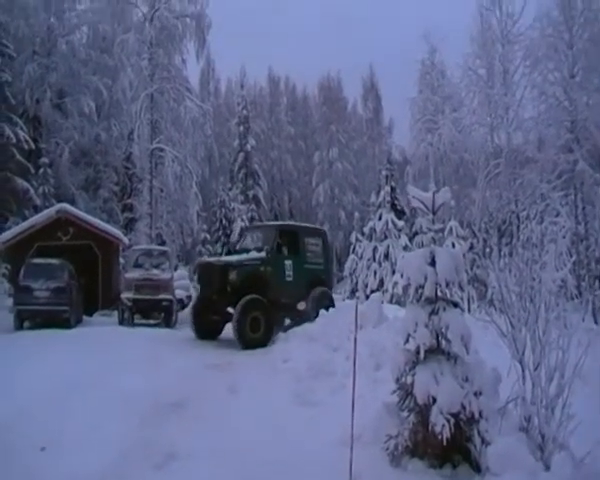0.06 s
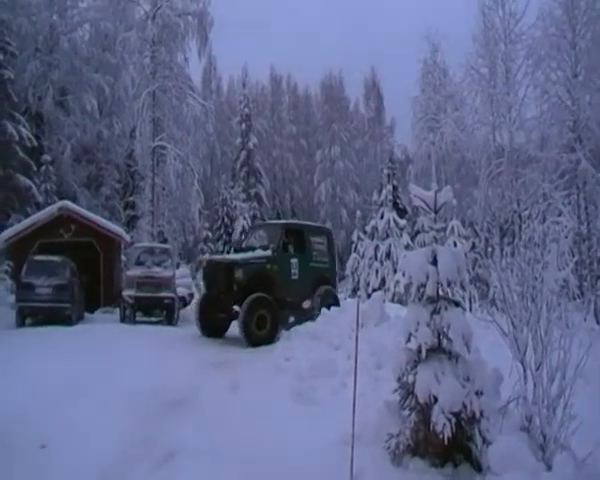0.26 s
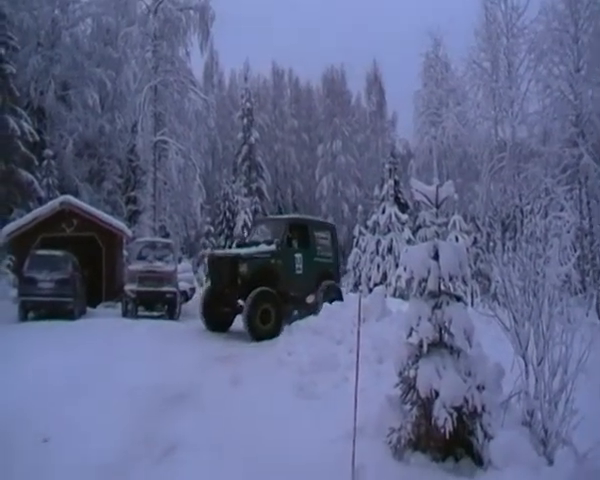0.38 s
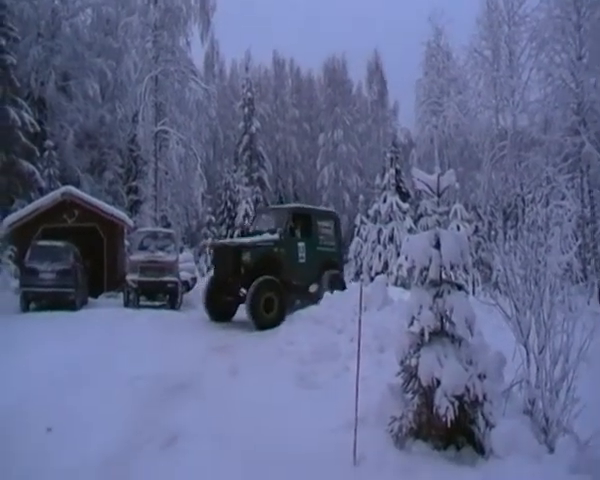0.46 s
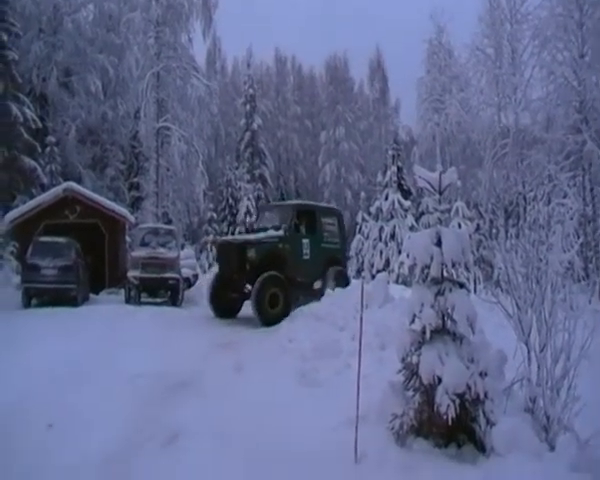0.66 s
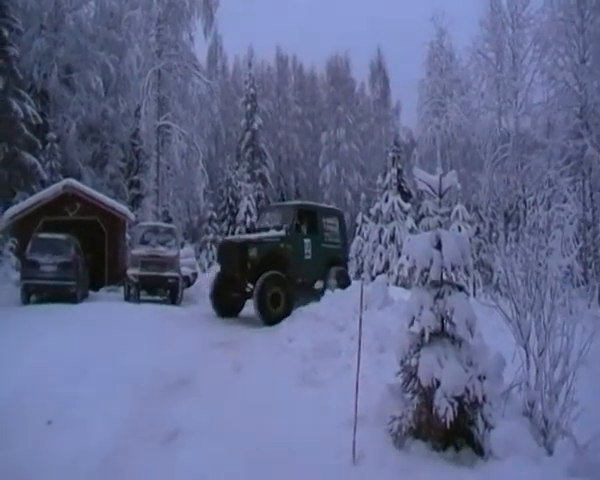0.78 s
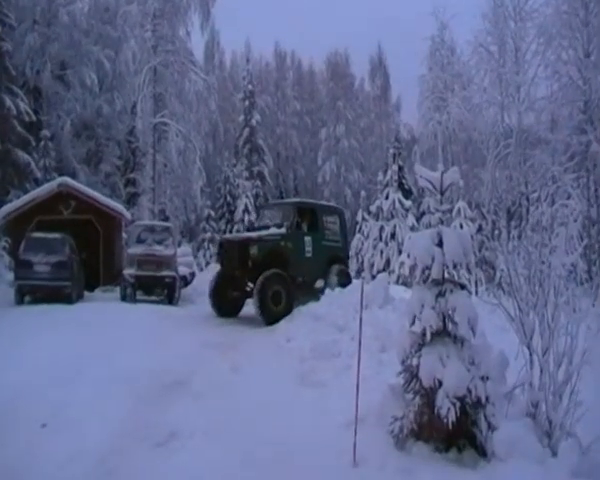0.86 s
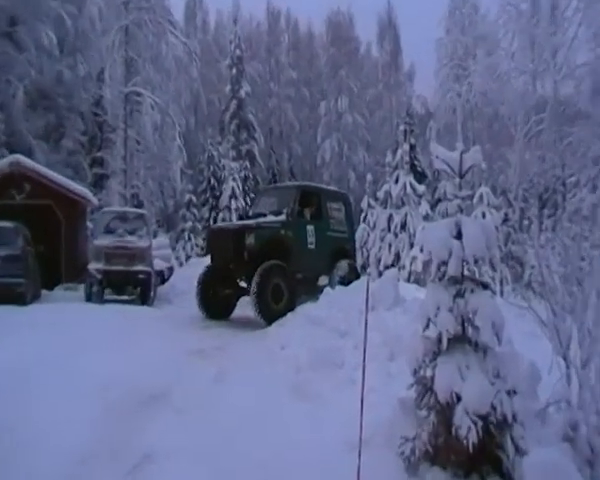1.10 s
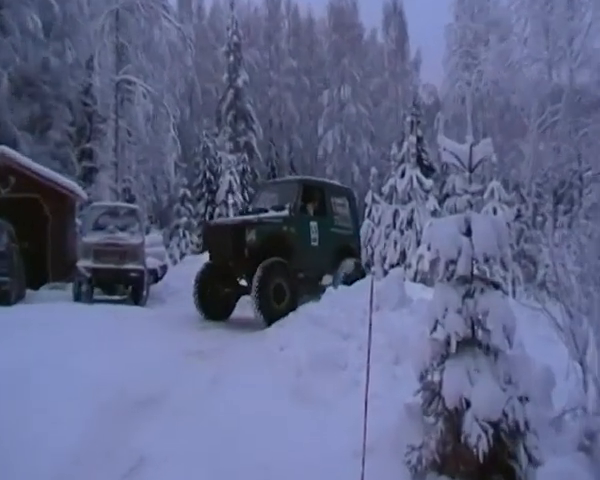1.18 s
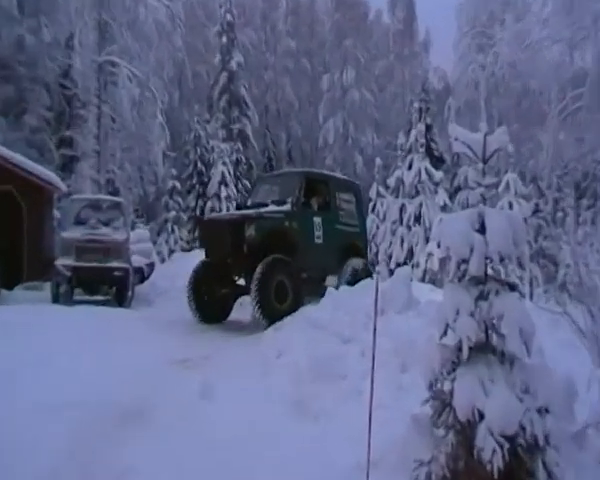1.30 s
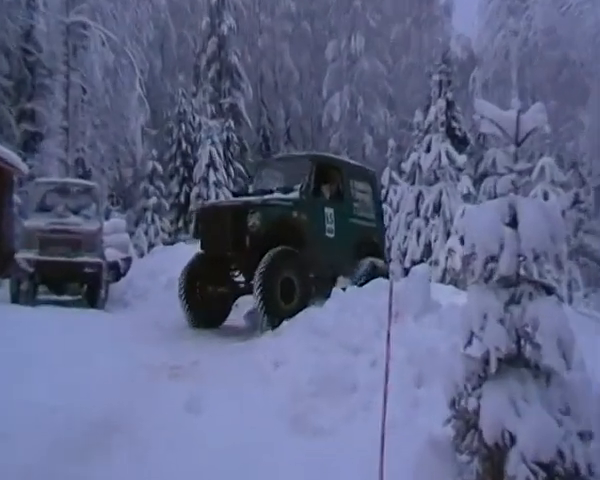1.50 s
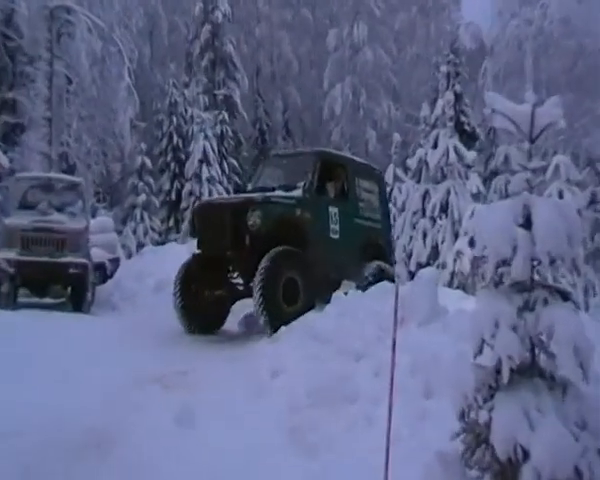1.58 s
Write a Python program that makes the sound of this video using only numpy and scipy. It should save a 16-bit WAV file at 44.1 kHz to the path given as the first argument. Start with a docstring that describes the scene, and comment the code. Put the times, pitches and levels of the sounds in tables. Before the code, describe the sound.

A small off-roader's drive belt squeaks over its low, pulsing engine in a snowy yard. The engine runs from the start with a soft fan rush. From about 0.2 seconds the much louder belt gives rapid, irregular high chirps and short squeals with a faint echo, rasping hardest around 1.2 seconds and stopping by 1.4. The engine gradually picks up speed from about 1 second to the end.

```python
"""A snowy yard, with a small off-roader labouring at one spot in front of a stereo microphone.
Its slipping drive belt is loudest: it chirps, bows the pulleys into squeals, and rasps when it grabs.
Underneath, the exhaust pulses, fan and valves rush and gears whine as the engine slowly picks up speed.
Trees and sheds return a faint echo of the belt."""
import sys
import numpy as np
from scipy import signal
from scipy.fft import rfft, irfft
from scipy.io import wavfile

SR = 44100
rng = np.random.default_rng(int(sys.argv[2]) if len(sys.argv) > 2 else 0)


def master_out(mix):
    """Clip the mix to full scale and print it as 16-bit PCM to the path in sys.argv[1]."""
    frames = np.transpose(np.atleast_2d(mix))
    ceiling = np.clip(frames, -1, 1)
    pcm = np.round(ceiling * 32767).astype(np.int16)
    wavfile.write(sys.argv[1], SR, pcm)


N = 72765

# Engine speed and exhaust harmonics: time_s, firing_hz, second_db, third_db, fourth_db
ENGINE_RUN = [(0, 30.96, -41.5, -51, -44.5), (.294, 28.59, -47, -41, -43.5), (.514, 29.09, -44, -45.5, -43),
              (1.0, 32.88, -40, -41, -50.5), (1.65, 41.97, -32, -39.5, -50)]


def belt_chirps():
    """Each slip swells the belt's whistle and drags it flat; a second rib sags less and beats with it."""
    # Slips of the belt: peak_s, rise_s, fall_s, lowest_hz, level_db, flutter_ratio
    slips = [(0.236, 0.0029, 0.0074, 4170, -22, 0.2), (.309, 0.0033, 0.0038, 4730, -14, 0.14),
             (0.32, 0.0023, 0.0039, 4630, -22, 0.14), (0.379, 0.0051, 0.0082, 4640, -14, 0.18),
             (.513, 0.0028, 0.0054, 4340, -16, 0.31), (.574, .005, .010, 3940, -19, 0.97),
             (.640, .004, 0.0082, 3880, -18.5, 1.11), (0.827, 0.0035, 0.0017, 4700, -28.5, 0.14),
             (0.838, 0.0031, 0.00714, 4620, -19.5, 0.14), (.902, .005, 0.01311, 4250, -20, 0.48),
             (.945, 0.0035, 0.0037, 4370, -36, 0.42), (0.963, .008, .010, 4130, -20.5, 0.43),
             (1.005, 0.00484, 0.01, 4130, -21.5, 0.48), (1.025, 0.0049, 0.0079, 4080, -17.5, .5),
             (1.067, 0.00388, 0.0071, 4153, -21, 0.3), (1.082, 0.00567, 0.0095, 3980, -19, 0.57),
             (1.108, 0.0036, 0.0086, 4070, -26.5, 0.65), (1.123, 0.0057, 0.0044, 3780, -23.5, 0),
             (1.233, 0.0043, .008, 4080, -14, 0)]
    # Faint whistle of the sliding belt: time_s, pitch_hz, level_db
    whistle = [(.19, 4350, -58), (.22, 4290, -33.5), (.29, 5100, -52), (.36, 5000, -36.5),
               (.42, 4700, -47.5), (.62, 4698, -43.5), (.75, 4844, -52), (.87, 4778, -45.5),
               (1.17, 4483, -35), (1.3, 4440, -65)]
    wobble, sag_breadth, rib_sag_share = .031, 1.4, .45
    octave_db, scuff_db = -22, -14
    free_hz = curve(whistle) * (1 + .023 * drift(600))
    main_gain = undb(curve(whistle, axis=2) + 3.95 * drift(120))
    rib_gain, sag_hz = 0, 0
    for peak_s, rise_s, fall_s, lowest_hz, level_db, flutter in slips:
        t = clock() - peak_s
        away = (t / np.where(t < 0, rise_s, fall_s)) ** 2 / 2
        swell = undb(level_db) * np.exp(-away) / np.hypot(1, flutter)
        main_gain = main_gain + swell
        rib_gain = rib_gain + flutter * swell
        sag_hz = np.maximum(sag_hz, (free_hz - lowest_hz) * np.exp(-away / sag_breadth ** 2))
    rib_hz = (free_hz - rib_sag_share * sag_hz) * (1 + wobble * drift(274.4))
    main_hz = (free_hz - sag_hz) * (1 + wobble * rib_gain / main_gain * drift(640))
    tone = main_gain * np.exp(1j * phase_of(main_hz)) + rib_gain * np.exp(1j * phase_of(rib_hz))
    octave = undb(octave_db) * tone ** 2 / np.hypot(main_gain, rib_gain)
    scuff = unit(resonate(rng.standard_normal(N), hz=3830, width_hz=1160))  # friction noise
    return np.sqrt(2) * (tone + octave).imag + undb(scuff_db) * rib_gain * scuff


def belt_rasps():
    """Stick-slip jerks ring belt and pulleys; a harder grip makes them slower, rougher and brighter."""
    # Grabs of the belt: start_s, length_s, level_db, grip_fraction
    grabs = [(.24, 0.002, -22, 0.22), (.708, 0.01, -22, 0.03), (.769, 0.0076, -16.5, 0),
             (1.138, 0.002, -15.5, .5), (1.2, 0.0067, -10.5, 0.7), (1.218, 0.0072, -23, 0.99),
             (1.241, 0.012, -16, .95), (1.261, 0.0035, -19.5, 0.4), (1.336, 0.0048, -24.5, .05),
             (1.363, .013, -19, .1)]
    # Resonances of belt and pulleys: pitch_hz, light_rub_db, hard_grip_db
    modes = [(1368, 7, 1.5), (2220, 4, 2.5), (2770, 1, -7), (3160, 0.5, 7), (4145, 4.5, -2.5),
             (4740, 3.5, -3), (5100, -23, -24), (6107, -64, -9), (6470, -53, -47), (8000, -12, -25),
             (9000, -39, -44)]
    rub_hz, grab_hz, jitter, scatter_db = 1386, 1044.7, .07, 2
    mode_q, flicker_db = 14, 6
    grip = np.clip(curve(grabs, axis=3), 0, 1)
    jerk_hz = (rub_hz + grip * (grab_hz - rub_hz)) * np.exp(jitter * (1 + grip) * drift(700))
    jerk_count = np.floor(phase_of(jerk_hz) / (2 * np.pi))
    jerks = np.diff(jerk_count, prepend=0) * undb(scatter_db * drift(880))
    jerks = signal.sosfilt(signal.butter(4, 950, "high", fs=SR, output="sos"), jerks)
    jerks = signal.sosfilt(signal.butter(2, 9500, fs=SR, output="sos"), jerks)
    ringing, out = 0, 0
    for hz, light_db, hard_db in modes:
        mode_db = light_db + grip * (hard_db - light_db) + flicker_db * drift(195)
        ringing += resonate(jerks, hz, hz / mode_q) * undb(mode_db)
    for start_s, length_s, level_db, _ in grabs:
        shape = envelope(start_s, length_s, attack_s=.0069, release_s=.0074)
        rasp = ringing * shape
        out += undb(level_db) * rasp * np.linalg.norm(shape) / np.linalg.norm(rasp)
    return out


def pulley_squeals():
    """The belt bows a pulley mode into a nearly steady tone with two overtones."""
    # Bowed pulley tones: start_s, length_s, pitch_hz, level_db, overtones_db
    squeals = [(.209, .16, 1528, -33.5, -26), (0.227, .078, 1528, -27, -49),
               (0.38, 0.075, 1519, -28.5, -29), (.647, 0.054, 1394, -27, -8), (.696, 0.095, 1401, -28, -11),
               (0.738, 0.051, 1554, -27, -43), (0.819, 0.042, 1535, -25, -28),
               (1.061, 0.35, 1529, -33.5, -34), (1.148, 0.041, 1426, -26.5, -7.5),
               (1.348, 0.039, 1389, -26, -14), (1.136, 0.0046, 2266, -16.5, -38),
               (1.232, 0.012, 2230, -20, -22)]
    waver = 1 + .00321 * drift(203.3)
    second_gain, third_gain = (undb(2.5 * drift(80)) for _ in range(2))
    out = 0
    for start_s, length_s, pitch_hz, level_db, overtones_db in squeals:
        phase = phase_of(pitch_hz * waver)
        overtones = second_gain * np.sin(2 * phase) + third_gain * np.sin(3 * phase)
        tone = np.sqrt(2) * (np.sin(phase) + undb(overtones_db) * overtones)
        out += undb(level_db) * tone * envelope(start_s, length_s, attack_s=.0024, release_s=.0089)
    return out * undb(.4 * drift(84))


def pulley_ring():
    """Light rubbing keeps one pulley mode faintly ringing."""
    # Strength of the ring: time_s, level_db
    levels = [(.1, -60), (.24, -43.5), (.55, -49.5), (.73, -37), (.9, -50), (1.35, -42), (1.5, -55)]
    pitch_hz, width_hz = 2304, 119
    rub = resonate(rng.standard_normal(N), pitch_hz, width_hz)
    return undb(curve(levels)) * unit(resonate(rub, pitch_hz, width_hz))


def exhaust(firing_phase):
    """Muffled firing pulses: four strong harmonics and a fading series above."""
    fundamental_db, upper_db, db_per_order = -47.5, -62.5, -1.5
    out = undb(fundamental_db) * np.cos(firing_phase)
    for k in range(2, 5):
        out += undb(curve(ENGINE_RUN, axis=k)) * np.cos(k * firing_phase)
    for k in range(5, 10):
        out += undb(upper_db + db_per_order * k + 2 * drift(4.3)) * np.cos(k * firing_phase)
    return np.sqrt(2) * out


def fan_and_valves(firing_phase):
    """Running noise that throbs with the firings and grows towards the end."""
    # Spectrum of fan and valves: frequency_hz, relative_db
    spectrum = [(76, -18), (130, -6.5), (265, -13.5), (314, -15), (730, -14), (864, -10.5), (1060, -9.5),
                (1640, -7), (1970, -19.5), (2170, -19), (4100, -23.5), (4940, -25), (11500, -36.5),
                (15000, -78), (22000, -120)]
    # Strength of their noise: time_s, level_db
    levels = [(0, -38.5), (.5, -39.5), (1.0, -38), (1.4, -36.5), (1.65, -34.5)]
    throb_depth, side_db = .11, -15.5
    mid, side = (unit(colour(rng.standard_normal(N), spectrum)) for _ in range(2))
    gain = undb(curve(levels)) * (1 + throb_depth * np.cos(firing_phase))
    return gain * (mid + undb(side_db) * side * np.array([[1], [-1]]))


def engine_whines():
    """Two gear whines follow the engine's speed; the accessories add brief wavering tones."""
    # Accessory whines: start_s, length_s, pitch_hz, level_db
    whines = [(0, 0.159, 1624, -40.5), (1.552, 0.13, 880.5, -41)]
    gear_db, gear_orders = -55, (27, 32)
    firing_phase = phase_of(curve(ENGINE_RUN) * (1 + .0019 * drift(39)))
    waver = 1 + .018 * drift(27)
    flicker = undb(2 * drift(27))
    out = undb(gear_db) * sum(np.sin(k * firing_phase) for k in gear_orders)
    for start_s, length_s, pitch_hz, level_db in whines:
        shape = envelope(start_s, length_s, attack_s=.0075, release_s=.024)
        out += undb(level_db) * shape * np.sin(phase_of(pitch_hz * waver))
    return np.sqrt(2) * flicker * out


def yard_echo(x, t60_s):
    """Dense fading reflections off trees and sheds, different left and right."""
    tail = rng.standard_normal((2, N)) * np.exp(-np.log(1000) * clock() / t60_s)
    tail /= np.sqrt(np.sum(tail ** 2, axis=1, keepdims=True))
    return signal.fftconvolve(x[None], tail, axes=1)[:, :N]


def undb(db):
    """Decibels to gain."""
    return 10 ** (np.asarray(db) / 20)


def unit(x):
    """Scale to rms 1."""
    return x / np.sqrt(np.mean(x ** 2))


def clock():
    """Time of each sample in s."""
    return np.arange(N) / SR


def curve(rows, axis=1):
    """One column of a table, joined by straight lines in time."""
    rows = np.array(rows)
    return np.interp(clock(), rows[:, 0], rows[:, axis])


def colour(x, points):
    """Filter by points of frequency_hz, gain_db."""
    hz, db = np.array(points).T
    f = np.maximum(np.fft.rfftfreq(N, 1 / SR), 1)
    return irfft(rfft(x) * undb(np.interp(np.log(f), np.log(hz), db)), N)


def drift(rate_hz):
    """Smooth random motion of rms 1, with a bandwidth of about rate_hz."""
    f = np.fft.rfftfreq(N, 1 / SR)
    return unit(irfft(rfft(rng.standard_normal(N)) * np.exp(-(f / rate_hz) ** 2), N))


def phase_of(hz):
    """Phase of a moving frequency in radians."""
    return 2 * np.pi * np.cumsum(hz) / SR


def envelope(start_s, length_s, attack_s, release_s):
    """Smooth rise around the start, hold, exponential release."""
    t = clock() - start_s
    rise = np.sin(np.pi / 2 * np.clip(t / attack_s + .5, 0, 1)) ** 2
    return rise * np.exp(-np.maximum(t - length_s, 0) / release_s)


def resonate(x, hz, width_hz):
    """Band-pass with gain 1 at the centre."""
    return signal.lfilter(*signal.iirpeak(hz, hz / width_hz, fs=SR), x)


def scene():
    """Belt, engine and echo; the belt's treble meets the two microphone ports out of phase."""
    # Stereo balance at the microphone: frequency_hz, left_minus_right_db
    balance = [(60, -2), (360, -1.5), (2100, 1), (4200, -9.5), (6900, -8.5), (9000, -2)]
    side_db, echo_db = -6, -8.5
    firing_phase = phase_of(curve(ENGINE_RUN))
    belt = belt_chirps() + pulley_squeals() + pulley_ring() + belt_rasps()
    treble = signal.sosfilt(signal.butter(2, 4000, "high", fs=SR, output="sos"), belt)
    side = undb(side_db) * signal.hilbert(treble).imag * np.array([[1], [-1]])
    echo = undb(echo_db) * yard_echo(belt, t60_s=.14)
    engine = exhaust(firing_phase) + fan_and_valves(firing_phase) + engine_whines()
    left, right = belt + side + echo + engine
    return np.array([colour(left, [(hz, db / 2) for hz, db in balance]),
                     colour(right, [(hz, -db / 2) for hz, db in balance])])


def record(dry):
    """The camera rounds the highest peaks and cuts the top of the treble."""
    ceiling, top_hz = .9, 12000
    rounded = dry / (1 + (dry / ceiling) ** 4) ** .25
    return signal.sosfilt(signal.ellip(8, .2, 70, top_hz, fs=SR, output="sos"), rounded)


dry = scene()
out = record(dry)
master_out(out)
```